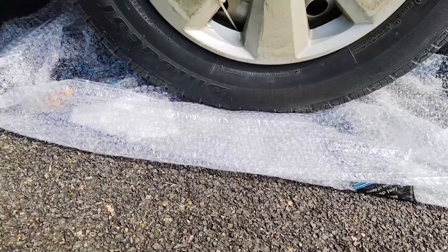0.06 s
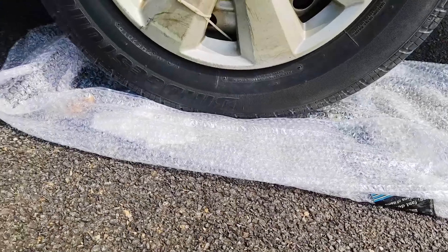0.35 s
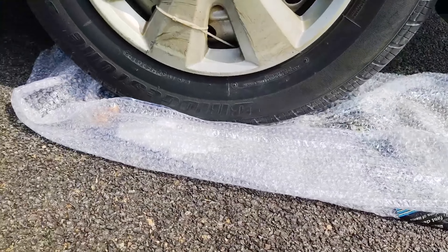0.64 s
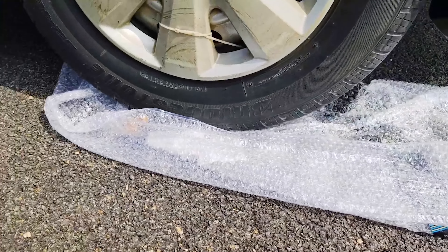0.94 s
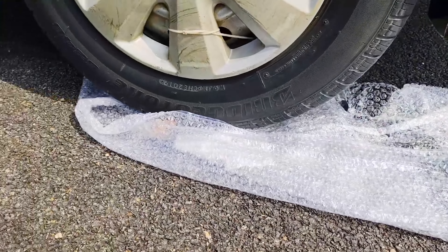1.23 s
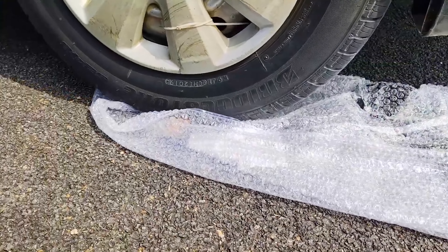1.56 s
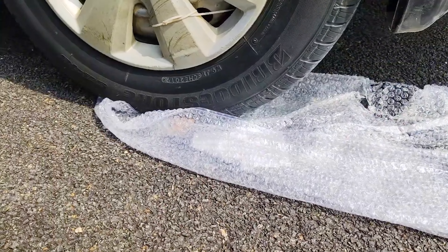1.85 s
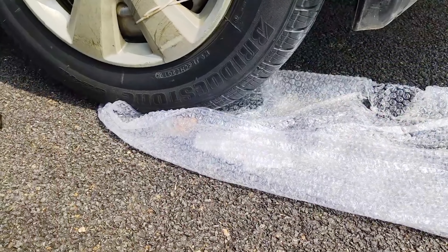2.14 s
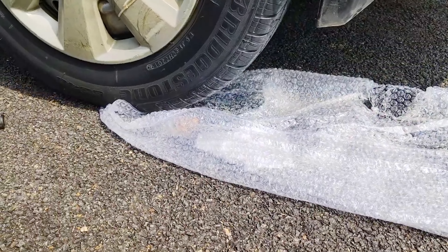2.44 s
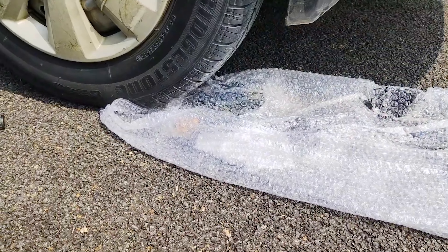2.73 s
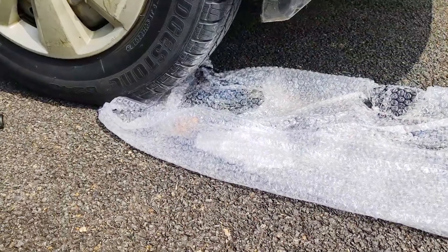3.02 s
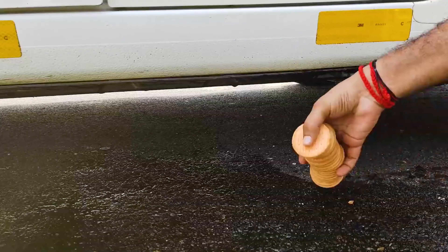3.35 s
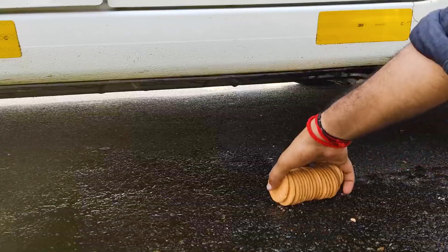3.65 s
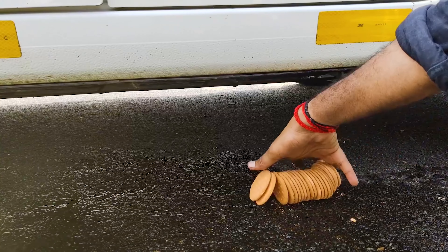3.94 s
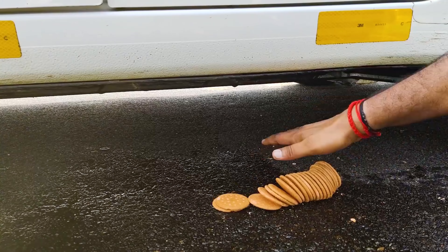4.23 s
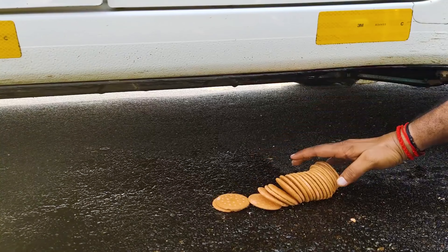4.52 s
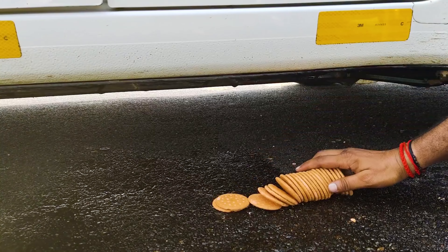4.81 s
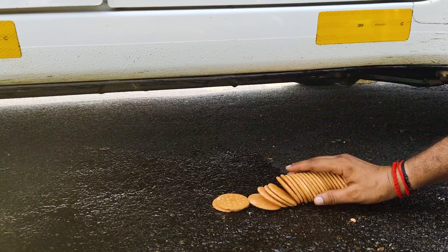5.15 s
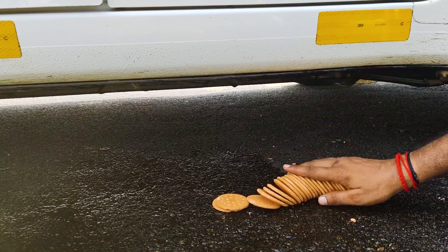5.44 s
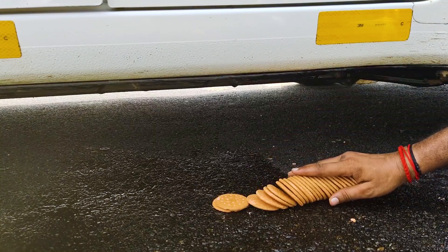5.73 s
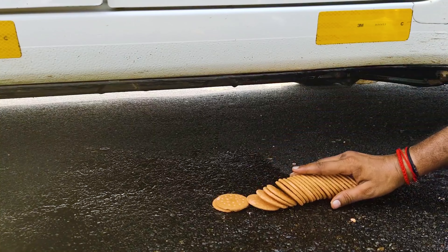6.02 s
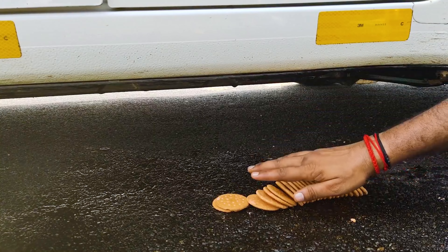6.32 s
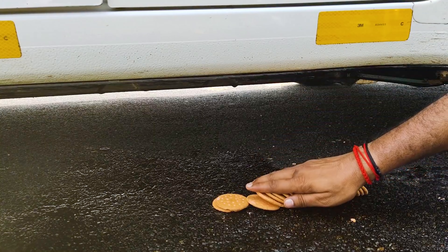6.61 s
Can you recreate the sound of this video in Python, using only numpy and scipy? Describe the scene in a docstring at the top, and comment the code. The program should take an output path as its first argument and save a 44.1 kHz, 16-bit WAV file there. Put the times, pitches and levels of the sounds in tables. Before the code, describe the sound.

Bubble wrap pops and crackles under a car tyre, followed by quiet clicks and rubbing of biscuits over a faint engine.

```python
"""On asphalt beside an idling car, a tyre rolls over bubble wrap. Air cells burst in a dense run,
each a briefly ringing puff; the film crinkles and sometimes rips with a bright snap, over engine
whir and a few gusts of wind. The scene then changes abruptly: a hand lays a stack of biscuits on the
road and nudges them into a row. Friction makes small scrapes and impacts make ringing clicks, while
the hollow under the car resonates and the engine chuffs softly."""
import sys
import numpy as np
from scipy import signal
from scipy.fft import rfft, irfft
from scipy.io import wavfile
from scipy.ndimage import uniform_filter1d

SR = 44100
rng = np.random.default_rng(int(sys.argv[2]) if len(sys.argv) > 2 else 0)


def put_to_file(sound):
    """Save the sound as 16-bit audio at rate SR, in the file named by the first command-line argument."""
    columns = np.atleast_2d(sound).T  # one column per channel
    safe = np.clip(columns, -1, 1)
    whole_steps = np.round(safe * 32767)
    wavfile.write(sys.argv[1], SR, whole_steps.astype(np.int16))


N = 302967
TIME = np.arange(N) / SR
CHANGE_S = 3.2  # from the wheel to the biscuits
USUAL_SNAP_DB = -27  # treble of a typical pop against the whole pop

# Levels in the tables are relative: each source applies its own gain.
# spectrum of the engine whir: frequency_hz, level_db
WHIR_SPECTRUM = [(90, -39.5), (200, -31.5), (400, -24), (520, -9.5), (730, 1), (1000, -6.5), (1200, 0),
                 (1600, -8.5), (2050, -13), (2350, -31.5), (2700, -38.5), (3100, -15.5), (3900, -23),
                 (4900, -40), (7000, -44.5), (9000, -73)]
# envelope of the whir: time_s, level_db
WHIR_ENVELOPE = [(0, -39.5), (.45, -37.5), (1.3, -45.5), (2.1, -40.5), (2.6, -40), (3.2, -42.5)]
# thin tones in the whir: pitch_hz, level_db
WHIR_TONES = [(860, -53.5), (1210, -48.5), (1340, -59.5)]
# engine hum, firing rate first: pitch_hz, at_wheel_db, at_sill_db
IDLE_PARTIALS = [(31.4, -53.5, -66.5), (62.5, -59.5, -66.5), (87.8, -63.5, -64.5)]
# spectrum of the wind: frequency_hz, level_db
WIND_SPECTRUM = [(15, -3.5), (30, 5), (60, -5), (110, -15.5), (200, -30), (500, -44), (3000, -86)]
# gusts of wind: peak_s, level_db, half_length_s
WIND_GUSTS = [(0.044, -33.5, 0.13), (0.297, -38, 0.072), (0.566, -38, .04), (.9, -53.5, 0.14),
              (2.7, -58.5, 0.11), (2.916, -41, 0.03), (3.177, -43.5, 0.045)]
# spectrum of the creasing sheet: frequency_hz, level_db
CRINKLE_SPECTRUM = [(190, -19), (310, 5), (750, 3.5), (1500, -8), (2600, -10.5), (4000, -13.5),
                    (6500, -29.5), (9000, -36.5), (12000, -59)]
# the louder air cells bursting: start_s, level_db, pitch_hz, snap_db
CELL_BURSTS = [(0.007, -1.5, 732, -27), (0.016, 2, 787, -23), (0.062, -1, 797, -22.5),
               (0.089, -5.5, 777, -26), (0.116, -6.5, 730, -20.5), (0.159, -3, 779, -23.5),
               (0.2, -3.5, 880, -14.5), (0.227, -5, 915, -19), (0.232, -7.5, 700, -21.5),
               (0.248, -1, 904, -22.5), (0.265, -6, 721, -24), (0.286, -4, 715, -24.5),
               (0.301, -3, 681, -24), (0.332, -4, 755, -12), (0.366, -3.5, 741, -21),
               (0.38, -6.5, 545.4, -21), (0.465, 1.5, 760, -32.5), (0.484, -6.5, 666, -28),
               (0.494, 0, 638, -15), (0.531, -1.5, 710, -28), (0.566, -7.5, 606, -24.5),
               (0.603, 1.5, 673, -14), (0.638, -2, 1310, -33), (0.696, -3, 766, -17.5),
               (0.726, -10.5, 690, -21), (0.735, -8.5, 1050, -17.5), (0.753, -2.5, 1100, -18.5),
               (0.769, -1.5, 940, -8.5), (0.772, -3, 830, -30), (0.795, -7.5, 760, -25.5),
               (0.803, -1, 724, -27.5), (0.818, 0, 720, -20), (0.825, -0.5, 593, -19),
               (0.828, 0.5, 810, -13.5), (0.833, -4, 754, -30), (0.84, -6.5, 812, -27.5),
               (0.846, -3.5, 792, -34.5), (0.897, -2, 732, -23.5), (0.906, -4, 719, -29),
               (0.919, -1.5, 767, -28), (0.928, -5, 710, -18), (0.969, -3.5, 670, -30.5),
               (0.983, -5.5, 1090, -21), (1.001, -0.5, 660, -21.5), (1.008, -1, 719, -21),
               (1.04, -8.5, 1049, -25), (1.045, -2.5, 694, -22.5), (1.059, -5.5, 1922, -19),
               (1.068, -8, 703, -18.5), (1.092, -5.5, 840, -30), (1.096, -3, 756, -23.5),
               (1.159, 1, 1132, -29), (1.175, 1, 820, -27), (1.182, -6.5, 776, -19),
               (1.202, -14, 1030, -15.5), (1.239, -2.5, 715, -25.5), (1.285, -6.5, 752, -26),
               (1.295, -10.5, 650, -32.5), (1.37, -3.5, 694, -25), (1.379, -4.5, 690, -24),
               (1.418, -7.5, 1122, -15.5), (1.435, -9.5, 675, -23), (1.449, -9, 670, -22),
               (1.5, -5.5, 870, -32), (1.548, 0.5, 656, -23), (1.557, -3, 847, -22),
               (1.562, -6, 802, -25.5), (1.627, -5, 665, -30.5), (1.652, -3, 689, -32.5),
               (1.671, -2.5, 1207, -29.5), (1.717, -7.5, 690, -21.5), (1.749, -1, 1040, -35.5),
               (1.792, -10, 799, -20), (1.812, -0.5, 850, -23.5), (1.828, -2, 828, -28.5),
               (1.857, 2.5, 1038, -29), (1.908, -4.5, 1090, -29), (1.951, -0.5, 1010, -34.5),
               (1.956, -5, 826, -14), (1.971, -0.5, 844, -19), (2.058, 1, 951, -20.5),
               (2.147, -12.5, 1223, -32.5), (2.196, -12.5, 1226, -32.5), (2.377, -10.5, 1360, -26),
               (2.471, -13, 813, -28), (2.53, -9, 1200, -21)]
# tone colour of the pops, hollow peaks near 710 and 1140 Hz and dips near 440 and 2700 Hz:
# centre_hz, quality_factor, added_share
POP_COLOUR = [(440, 1.2, -0.38), (712, 8, 0.6), (1140, 4.6, 0.31), (2700, 4.6, -0.58)]
# reverberation time between road and car body: frequency_hz, t60_s
SPACE_DECAY = [(250, .26), (1000, .22), (3000, .2), (7000, .19), (14000, .15)]
# spectrum of the reflections there: frequency_hz, level_db
SPACE_SPECTRUM = [(150, -6), (400, -4), (800, -1), (1500, 0), (2600, -1), (4000, 2), (8000, 1), (15000, -2)]
# the film ripping open: start_s, level_db
FILM_RIPS = [(0.0161, -17), (0.2095, -1.5), (0.3322, -12.5), (0.3406, -21), (0.6405, -13.5),
             (0.7387, -17.5), (0.7607, -16), (0.823, -16), (1.0083, -18.5), (1.1223, -24.5),
             (1.2047, -15.5), (1.4206, -17.5), (1.8157, -20), (1.9073, -20), (2.0587, -17.5), (2.3784, -20),
             (2.531, -17), (2.8785, -8)]
# spectrum of tearing film: frequency_hz, level_db
FILM_SPECTRUM = [(200, -32), (600, -14.5), (1300, 3.5), (2600, -2), (4000, -1), (7000, -9), (12000, -9),
                 (16000, -18.5)]
# soft bumps of air, then of the hand: start_s, level_db, centre_hz, length_s
SOFT_BUMPS = [(0.257, -18.5, 103.2, 0.073), (0.566, -32, 84.5, 0.09), (3.505, -33.5, 119, 0.028),
              (4.254, -53, 228, 0.12), (4.624, -50, 640, 0.05), (5.012, -47, 226.7, 0.23),
              (5.453, -49.5, 246.5, 0.2), (5.556, -48, 230.4, 0.068), (5.825, -59, 614, 0.16),
              (6.071, -53.5, 400, 0.13), (6.355, -56.5, 451, 0.084), (6.403, -53, 217.5, 0.075),
              (6.704, -58.5, 970, 0.083), (6.752, -47.5, 237, 0.092)]
# spectrum of the hiss under the car: frequency_hz, level_db
HISS_SPECTRUM = [(60, 4), (130, 8.5), (250, -7.5), (350, -0.5), (550, -3.5), (750, -8), (1150, -10),
                 (1500, -18), (2000, -22), (3000, -14.5), (4500, -23), (6200, -24.5), (7400, -26),
                 (8000, -32.5), (8900, -75)]
# envelope of that hiss: time_s, level_db
HISS_ENVELOPE = [(3.2, -46.5), (3.7, -49), (3.9, -48), (4.1, -55), (4.4, -94), (4.8, -71), (6.87, -62.5)]
# resonances of the hollow under the car: centre_hz, width_hz, level_db
HOLLOW_MODES = [(368.7, 76, -4), (763, 290, 4.5), (1143, 147, 1), (1794, 300, -2), (2114, 120, -8),
                (4424, 190, -5), (7120, 660, -6)]
# envelope of the hollow's ring: time_s, level_db
HOLLOW_ENVELOPE = [(3.2, -67), (3.7, -52), (4.05, -55.5), (4.25, -53), (4.42, -62.5), (4.7, -64),
                   (5.1, -72.5), (5.5, -71.5), (6.87, -79)]
# spectrum of biscuit faces rubbing: frequency_hz, level_db
RUB_SPECTRUM = [(80, -5), (170, -8.5), (240, 5.5), (290, -7), (350, 7.5), (500, -21), (650, -5),
                (1000, -71.5), (1500, -63.5)]
# envelope of the rubbing: time_s, level_db
RUB_ENVELOPE = [(3.21, -57.5), (3.8, -47), (4.05, -43), (4.4, -58), (4.7, -48), (4.9, -59), (5.3, -54.5),
                (5.7, -62), (6.87, -63.5)]
# envelope of the scraping on grit: time_s, level_db
GRIT_ENVELOPE = [(3.21, -46.5), (3.32, -43), (3.55, -64), (3.7, -44.5), (4, -65.5), (4.35, -69),
                 (5.3, -65.5), (5.75, -76.5), (6.4, -71), (6.87, -70.5)]
# resonances of a biscuit: centre_hz, width_hz, level_db
BISCUIT_MODES = [(1400, 1800, 0.5), (2016, 150, 6), (2760, 193, -7), (3296, 350, 0), (4170, 560, -1),
                 (4850, 120, -20.5), (5290, 114, -8), (6350, 1020, -9), (7250, 870, -1)]
# biscuits knocking together: start_s, level_db, centre_hz
BISCUIT_KNOCKS = [(3.33, -34, 2820), (3.675, -30.5, 1920), (3.741, -38, 3210), (3.8073, -38, 1800),
                  (3.937, -36.5, 4230), (4.0422, -30, 2080), (4.223, -29, 2120), (4.2936, -30, 2010),
                  (4.5081, -35, 3890)]
# resonances of the engine's chuff: centre_hz, width_hz, level_db
CHUFF_MODES = [(1420, 410, 1), (1940, 250, -7.5), (2740, 330, 3), (3370, 320, -5.5), (4016, 310, -6),
               (4480, 520, -9), (5290, 430, -10), (6486, 440, -23), (7170, 170, -2.5)]


def amp(db):
    """Decibels as an amplitude ratio."""
    return 10 ** (np.asarray(db) / 20)


def unit(x):
    """Normalisation to an RMS of one."""
    return x / np.sqrt(np.mean(x ** 2) + 1e-20)


def curve_at(points, hz):
    """Interpolation on a logarithmic frequency axis."""
    f, value = np.transpose(points)
    return np.interp(np.log(hz + 1), np.log(f + 1), value)


def envelope(points):
    """Amplitude over time, interpolated in decibels."""
    return amp(np.interp(TIME, *np.transpose(points)))


def add(mix, start_s, sound):
    """Superposition of a sound on the mix, in place."""
    part = mix[..., max(round(start_s * SR), 0):][..., :sound.shape[-1]]
    part += sound[..., :part.shape[-1]]


def colour(x, spectrum):
    """Zero-phase filtering by a spectrum."""
    hz = np.fft.rfftfreq(x.shape[-1], 1 / SR)
    return irfft(rfft(x) * amp(curve_at(spectrum, hz)), x.shape[-1])


def band(x, hz, q):
    """A single second-order resonance."""
    return signal.lfilter(*signal.iirpeak(min(hz, SR / 3), max(q, .5), SR), x)


def modal(x, modes, top_hz=7900):
    """Parallel resonances with deep valleys between them, cut off steeply at the top."""
    f = np.fft.rfftfreq(x.shape[-1], 1 / SR)
    gain = sum(amp(db) / np.sqrt(width) / (1 + (3.33 * (f - hz) / width) ** 2) for hz, width, db in modes)
    return irfft(rfft(x) * gain / np.sqrt(1 + (f / top_hz) ** 50), x.shape[-1])


def varied_ring(modes, samples, detune, spread_db):
    """Noise excites the modes, each halved in width and perturbed in pitch and level."""
    chance = rng.standard_normal((len(modes), 2))
    varied = [(hz * (1 + detune * a), width / 2, db + spread_db * b)
              for (hz, width, db), (a, b) in zip(modes, chance)]
    return modal(rng.standard_normal(samples), varied)


def pair(x, apart):
    """Sum and difference turn two unrelated signals into a partly coherent left and right."""
    return np.array([x[0] + apart * x[1], x[0] - apart * x[1]])


def grains(per_s, spread_db):
    """Two Poisson trains of impulses of uneven size."""
    size = amp(spread_db * np.minimum(rng.exponential(1, (2, N)), 4))
    return size * rng.standard_normal((2, N)) * (rng.random((2, N)) < per_s / SR)


def patchy(x, depth_db):
    """Random modulation in patches of time and frequency makes the timbre drift."""
    spectra = signal.stft(x, nperseg=1024, noverlap=768)[2]
    field = uniform_filter1d(rng.standard_normal(spectra.shape[1:]), size=9, axis=0)
    field = unit(uniform_filter1d(field, size=12, axis=1))
    return signal.istft(spectra * amp(depth_db * field), nperseg=1024, noverlap=768)[1][:, :N]


def waver(hz, depth):
    """A tone under slow random frequency modulation."""
    drift = unit(uniform_filter1d(rng.standard_normal(N), size=5000))
    return np.sqrt(2) * np.sin(2 * np.pi * np.cumsum(hz * (1 + depth * drift)) / SR)


def engine_whir(tones_db=-1):
    """Fan, belts and valves: noise amplitude-modulated at the firing rate, and a few thin tones."""
    air = unit(colour(patchy(rng.standard_normal((2, N)), depth_db=1.5), WHIR_SPECTRUM))
    firing_phase = TIME * IDLE_PARTIALS[0][0] % 1
    ticking = uniform_filter1d(unit(1 + 1.1 * np.exp(-firing_phase / .2)), size=60)
    tones = sum(amp(db + tones_db) * waver(hz, depth=.0047) for hz, db in WHIR_TONES)
    return pair(air, apart=.2) * ticking * envelope(WHIR_ENVELOPE) + tones


def engine_idle(at_wheel):
    """Periodic firing hums at its own rate and near its multiples."""
    return sum(waver(hz, depth=.012) * amp(sill_db + (wheel_db - sill_db) * at_wheel)
               for hz, wheel_db, sill_db in IDLE_PARTIALS)


def wind(calm_db=-61.5, left_db=-6, right_db=2):
    """Turbulent pressure makes a low rumble that swells with each gust."""
    gusts = sum(amp(db) * np.exp(-((TIME - at) / half) ** 2) for at, db, half in WIND_GUSTS)
    rumble = unit(colour(rng.standard_normal((2, N)), WIND_SPECTRUM))
    return pair(rumble, apart=.71) * (amp(calm_db) + gusts) * amp([[left_db], [right_db]])


def strain(rise_s=.012, fall_s=.06):
    """Strain in the sheet, 0-1, builds before each loud burst and relaxes exponentially after it."""
    t = np.arange(0, N / SR, .002)
    work = sum(amp(db) * np.exp(-np.maximum((at - t) / rise_s, (t - at) / fall_s))
               for at, db, _, _ in CELL_BURSTS)
    return np.interp(TIME, t, work / work.max())


def sheet_crinkle(full_strain_db=-30, exponent=.91):
    """Creasing under the tread emits tiny impulses, their amplitude a power law of strain."""
    ticks = unit(colour(patchy(grains(per_s=1100, spread_db=3), depth_db=4), CRINKLE_SPECTRUM))
    return pair(ticks, apart=.2) * strain() ** exponent * amp(full_strain_db)


def small_cells(limit=60, full_strain_per_s=36, top_db=-12, spread_db=9, pitch_hz=860, snap_range_db=14.5):
    """Weak bursts occur at a rate proportional to strain; rows as in CELL_BURSTS."""
    expected = np.cumsum(strain()) * full_strain_per_s / SR
    jitter, size, pitch, snap = rng.random((limit, 4)).T
    counts = np.arange(limit) + jitter
    cells = np.column_stack([np.interp(counts, expected, TIME), top_db - spread_db * size,
                             pitch_hz * 2 ** (pitch - .5), USUAL_SNAP_DB + snap_range_db * (snap - .5)])
    return list(cells[counts < expected[-1]])


def air_puff(samples, ring_hz, snap_db, low_hz, q=1.2, rupture_hz=2592, db_per_octave=7.5):
    """A damped resonator too small to radiate bass; a quicker rupture gives more treble."""
    s = 1j * np.fft.rfftfreq(samples, 1 / SR)
    resonance = -s / (1 + s / ring_hz / q + (s / ring_hz) ** 2)
    bass = s / low_hz
    radiation = bass ** 2 / (1 + 1.2 * bass + bass ** 2) * s ** 2 / (s ** 2 + 300 * s + 290 ** 2)
    edge_hz = rupture_hz * 2 ** ((snap_db - USUAL_SNAP_DB) / db_per_octave)
    puff = irfft(resonance * radiation / (1 + s / edge_hz) ** 2)
    return puff / abs(puff).max()


def cell_paths(t, distance, scatter_s=.0065, echo_db=-15):
    """Multipath propagation: direct sound, scatter and an echo off the car, set by distance (0-1)."""
    scatter = pair(colour(rng.standard_normal((2, len(t))), SPACE_SPECTRUM), apart=.2)
    paths = scatter * np.exp(-t / scatter_s) * (t > .0009)
    paths *= amp(-12 + 5 * distance) / np.linalg.norm(paths[0])
    add(paths, 0, np.ones(1))
    add(paths, .005 + .007 * distance, amp(echo_db) * np.ones(1))
    return paths


def cell_pops(ring_ratio=1.045, onset_delay_s=.0011, thinning_s=4.6, muffle_hz=5600, flap_db=-21,
              gain_db=-2):
    """Sudden pressure release: each bursting cell lets go a ringing puff with a hollow tone colour."""
    out, t = np.zeros((2, N)), np.arange(2048) / SR
    for at, db, pitch_hz, snap_db in list(CELL_BURSTS) + small_cells():
        cover, film, distance = rng.random(3)
        low_hz = 450 * 2 ** (at / thinning_s)  # the pops lose body as the wheel rolls off
        puff = air_puff(len(t), pitch_hz * ring_ratio, snap_db, low_hz)  # just above the listed pitch
        flap = np.sin(2 * np.pi * 1500 * 4 ** film * t) * np.exp(-t / .0018)  # the torn skin vibrates
        tread_cover = signal.butter(6, muffle_hz * (.65 + .6 * cover), fs=SR, output="sos")
        pop = signal.sosfilt(tread_cover, puff + amp(flap_db - 2 * film) * flap)
        heard = signal.fftconvolve(cell_paths(t, distance), pop[None], axes=1)
        add(out, at + onset_delay_s, amp(db + gain_db) * heard)
    return out + sum(share * band(out, hz, q) for hz, q, share in POP_COLOUR)


def reverberate(x, wet_db):
    """Reflections from car body and yard add a faint tail whose treble decays fastest."""
    t = np.arange(SR // 2) / SR
    hz, when, spectra = signal.stft(pair(rng.standard_normal((2, len(t))), apart=.36), SR, nperseg=256)
    decay = amp(-60 * when / curve_at(SPACE_DECAY, hz)[:, None])
    tail = signal.istft(spectra * decay, SR, nperseg=256)[1][:, :len(t)] * (t > .006)
    response = colour(amp(wet_db) * unit(tail), SPACE_SPECTRUM) / np.sqrt(len(t))
    return x + signal.fftconvolve(x, response, axes=1)[:, :N]


def film_rips(rise_s=.00023, decay_s=.0062, bright_hz=8640, db_per_octave=19.5, s_per_octave=3.5,
              gain_db=-5):
    """Fracture runs through the film, radiating a few milliseconds of bright noise."""
    out, t = np.zeros((2, N)), np.arange(4096) / SR
    burst = (1 - np.exp(-t / rise_s)) * np.exp(-t / decay_s)
    for at, db in FILM_RIPS:
        fizz = colour(rng.standard_normal((2, len(t))), FILM_SPECTRUM)
        # harder rips are brighter, as are later ones, when the wheel uncovers the sheet
        cutoff_hz = min(bright_hz * 2 ** (db / db_per_octave + at / s_per_octave), SR / 2.5)
        fizz = unit(signal.lfilter(*signal.butter(2, cutoff_hz, fs=SR), fizz))
        add(out, at, amp(db + gain_db) * pair(fizz, apart=.4) * burst)
    return out


def soft_bumps(hand_q=3.9, rise_share=.24):
    """Air buffets, and later the hand, make dull swells of band-limited noise."""
    out, t = np.zeros(N), np.arange(SR // 2) / SR
    for at, db, hz, length_s in SOFT_BUMPS:
        rise = t / (length_s * rise_share)
        swell = rise * np.exp(1 - rise)
        q = hand_q if at > CHANGE_S else hand_q / 2.4  # air buffets have little pitch
        thud = band(band(rng.standard_normal(len(t)), hz, q), hz, q / 2) * swell
        add(out, at, amp(db) * unit(thud) * np.sqrt(np.mean(swell ** 2)))
    return out


def underbody():
    """Hiss beside the sill, and the cavity resonance of the hollow under the car."""
    noise = patchy(rng.standard_normal((2, N)), depth_db=3.5)
    hiss = unit(colour(noise[0], HISS_SPECTRUM)) * envelope(HISS_ENVELOPE)
    return hiss + unit(modal(noise[1], HOLLOW_MODES)) * envelope(HOLLOW_ENVELOPE)


def biscuit_rubbing(body_db=-5, grit_db=-4):
    """Sliding friction: dry faces make low noise, and road grit excites the biscuit's modes."""
    body = unit(colour(patchy(rng.standard_normal((2, N)), depth_db=3.5), RUB_SPECTRUM))[0]
    grit = unit(modal(patchy(grains(per_s=500, spread_db=3), depth_db=7), BISCUIT_MODES))[0]
    return amp(body_db) * body * envelope(RUB_ENVELOPE) + amp(grit_db) * grit * envelope(GRIT_ENVELOPE)


def biscuit_clicks(rise_s=.00085, tick_s=.0031, slide_s=.069, slide_db=-16.5, gain_db=-7):
    """Impact excites a biscuit's modes as it tips against the next; a brief slide follows."""
    out, t = np.zeros(N), np.arange(8192) / SR
    contact = np.exp(-t / tick_s) + amp(slide_db) * np.exp(-(t / slide_s) ** 2)
    contact *= 1 - np.exp(-t / rise_s)
    for at, db, centre_hz in BISCUIT_KNOCKS:
        ring = varied_ring(BISCUIT_MODES, len(t), detune=.03, spread_db=5)
        add(out, at, amp(db + gain_db) * unit(band(ring, centre_hz, q=2.8)) * contact)
    return out


def engine_chuffs(start_s=4.498, cycle_s=.132, jitter_s=.016, rise_s=.0013, length_s=.064,
                  start_db=-60, db_per_s=-2, uneven_db=4, centre_hz=4180, spread_octaves=.083):
    """One cylinder emits a pulse of resonant hiss each cycle, uneven in time, strength and timbre."""
    out, t = np.zeros(N), np.arange(8192) / SR
    swell = (1 - np.exp(-t / rise_s)) * np.exp(-(t / length_s) ** 2)
    for at in np.arange(start_s, N / SR, cycle_s):
        ring = varied_ring(CHUFF_MODES, len(t), detune=.05, spread_db=4)
        hz = centre_hz * 2 ** (spread_octaves * rng.standard_normal())
        db = start_db + db_per_s * (at - start_s) + uneven_db * rng.uniform(-1, 1)
        add(out, at + jitter_s * rng.uniform(-1, 1), amp(db) * unit(band(ring, hz, q=.88)) * swell)
    return out


def from_left(x, left_db=.9, right_db=-1, lag_s=.000018):
    """A level difference sets the wheel slightly to the left; the left channel also lags minutely."""
    delay = np.exp(-2j * np.pi * np.fft.rfftfreq(N, 1 / SR) * lag_s)
    return np.array([irfft(rfft(x[0]) * delay, N), x[1]]) * amp([[left_db], [right_db]])


def scene():
    """Superposition: the wheel on the wrap, then a 2 ms crossfade to the biscuits in the centre."""
    at_wheel = np.clip((CHANGE_S - TIME) / .002 + 1, 0, 1)
    rips = reverberate(film_rips(), wet_db=-13)
    pops = reverberate(cell_pops(), wet_db=-16)
    wrap = from_left(pops + rips + sheet_crinkle() + engine_whir())
    bumps = soft_bumps() * amp(at_wheel * np.array([[-4], [2]]))  # air hits harder on the right
    wheel = wrap + wind()
    biscuits = underbody() + biscuit_rubbing() + biscuit_clicks() + engine_chuffs()
    return at_wheel * wheel + (1 - at_wheel) * biscuits + engine_idle(at_wheel) + bumps


def record(dry, edge_hz=15900):
    """Hard clipping at full scale, then a low-pass band limit."""
    lowpass = signal.firwin(511, edge_hz, window=("kaiser", 9), fs=SR)
    return signal.oaconvolve(np.clip(dry, -1, 1), lowpass[None], "same")


dry = scene()
out = record(dry)
put_to_file(out)
```